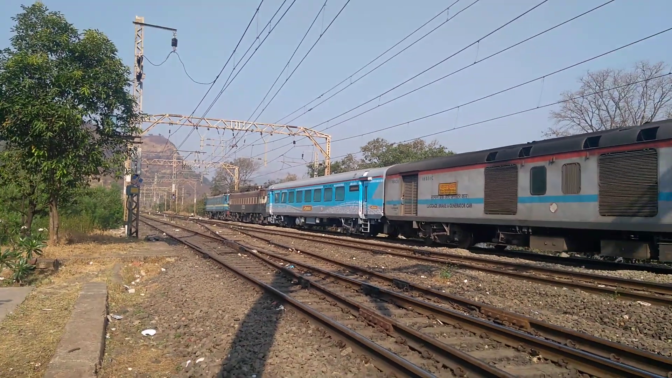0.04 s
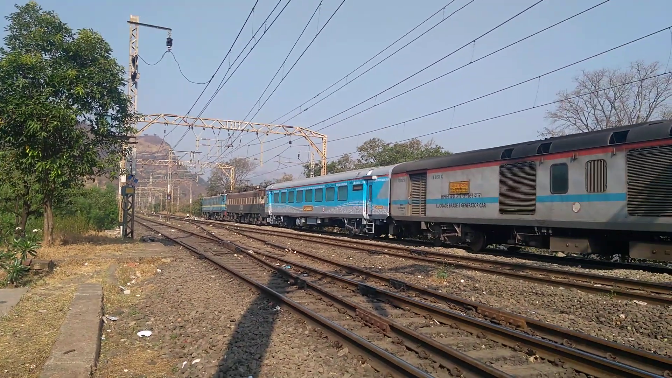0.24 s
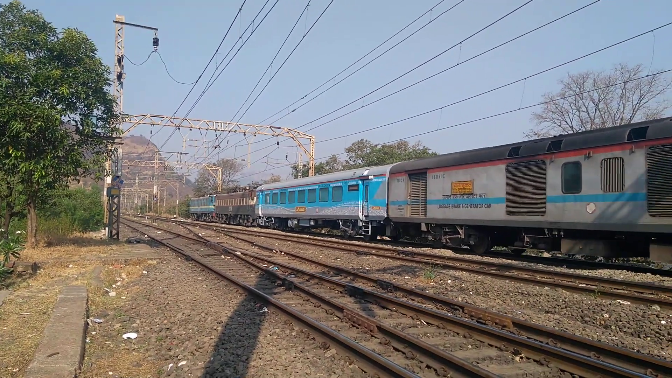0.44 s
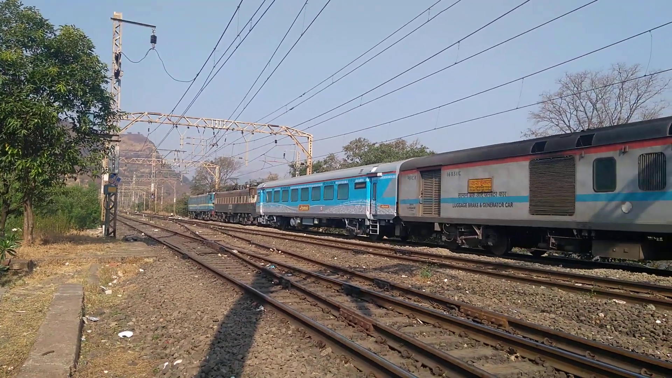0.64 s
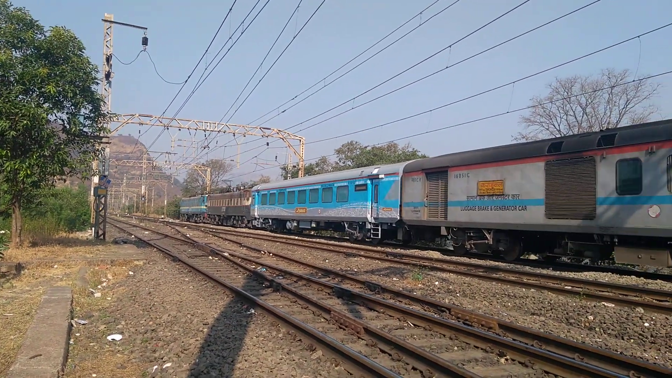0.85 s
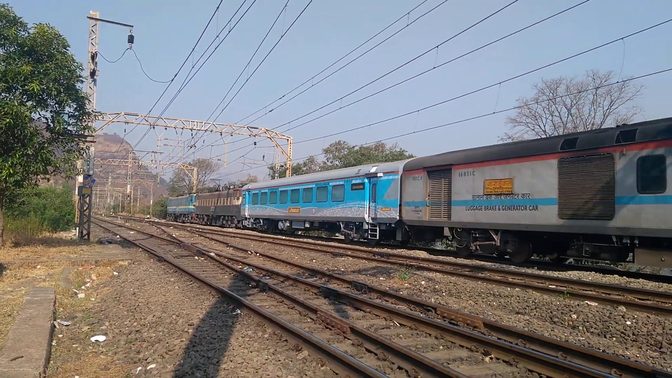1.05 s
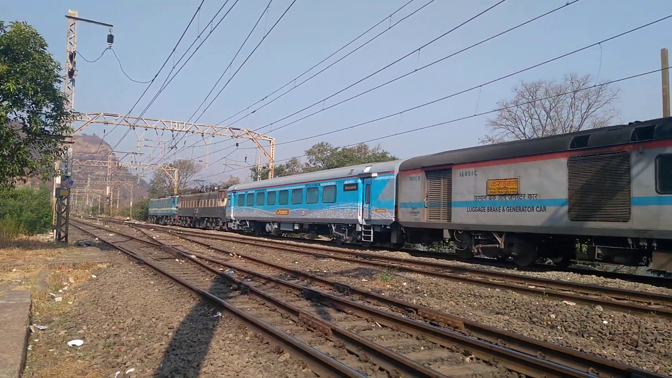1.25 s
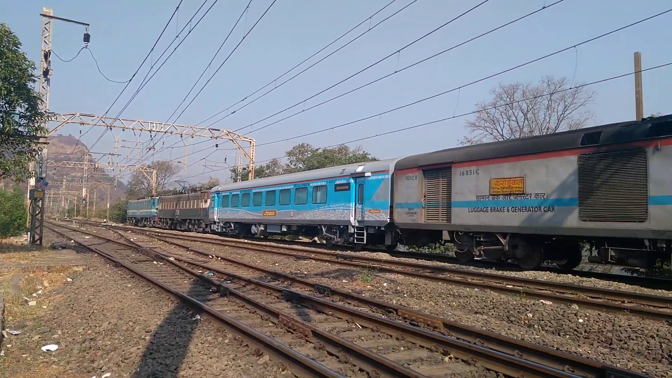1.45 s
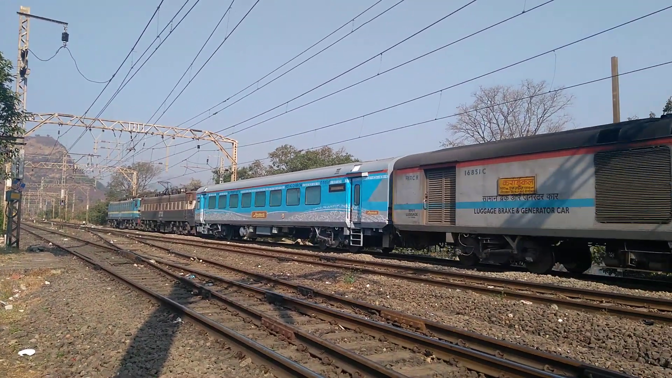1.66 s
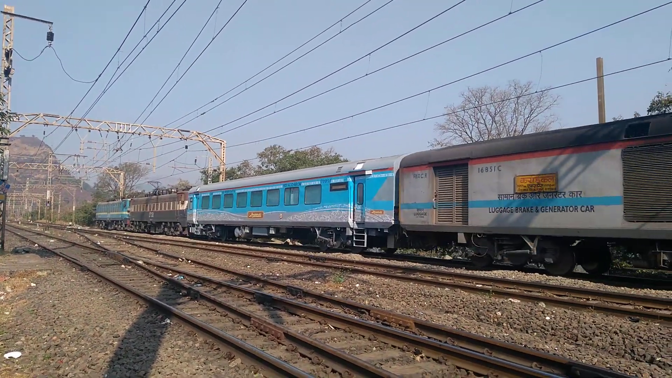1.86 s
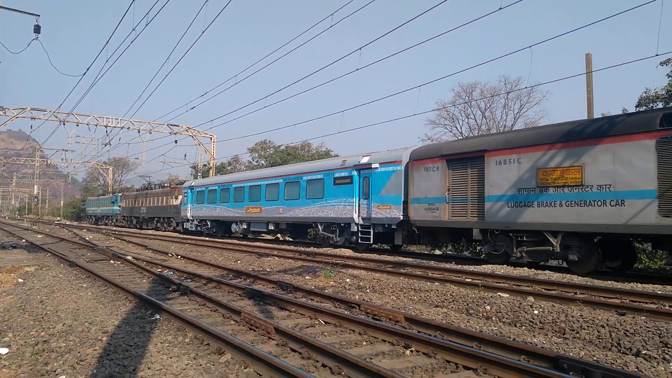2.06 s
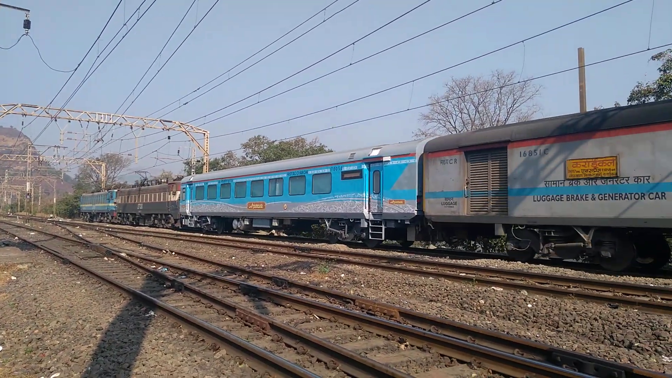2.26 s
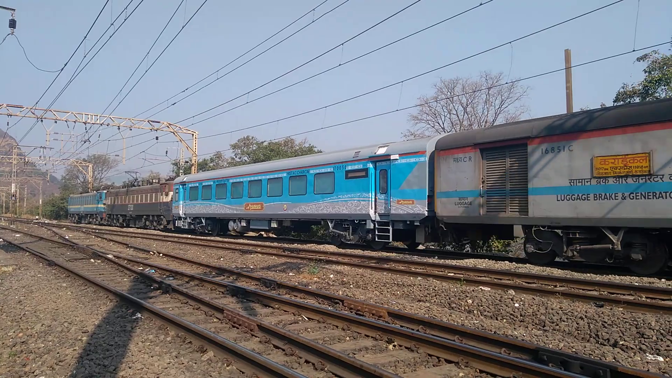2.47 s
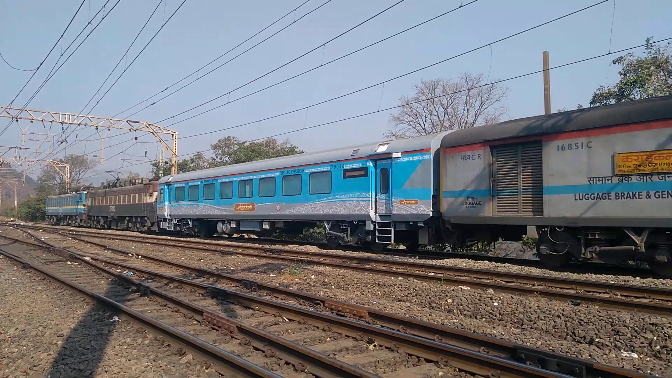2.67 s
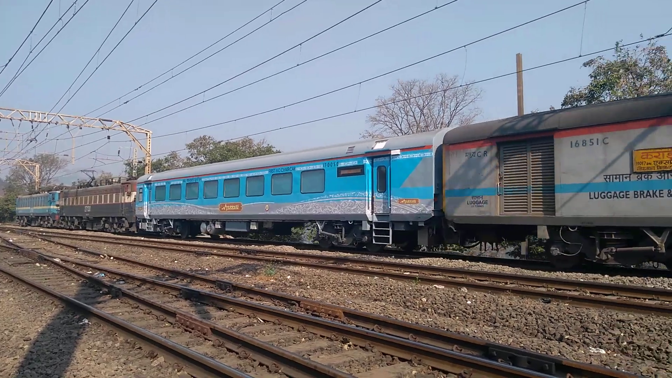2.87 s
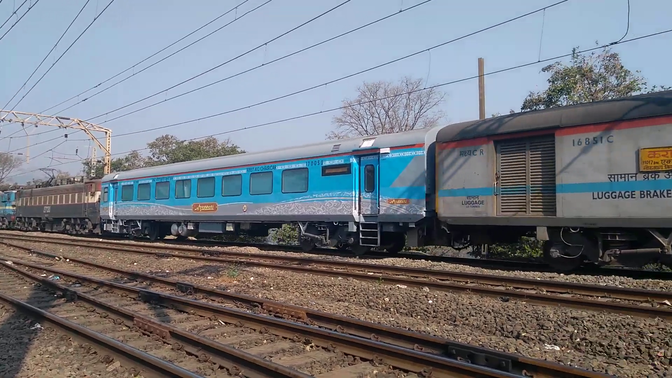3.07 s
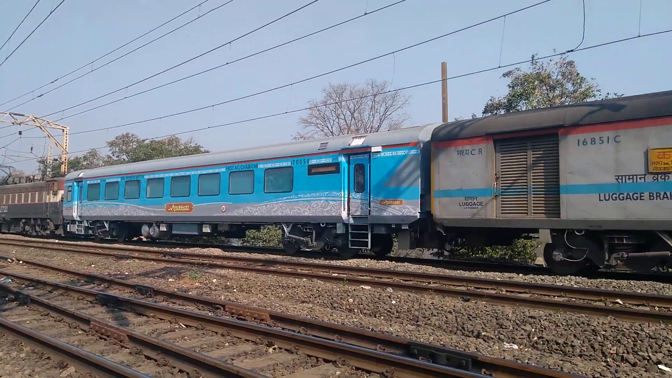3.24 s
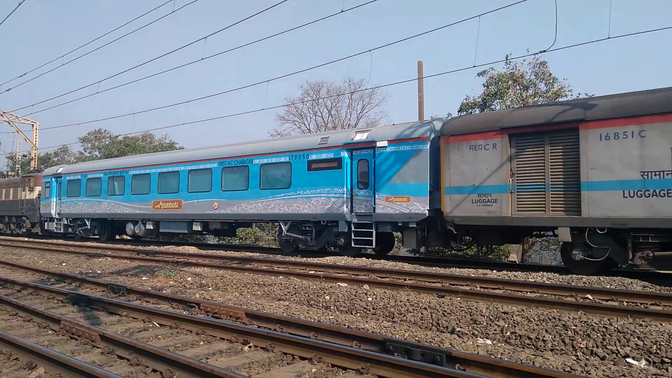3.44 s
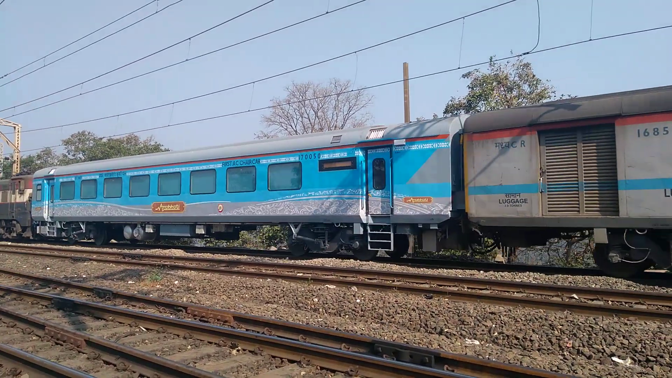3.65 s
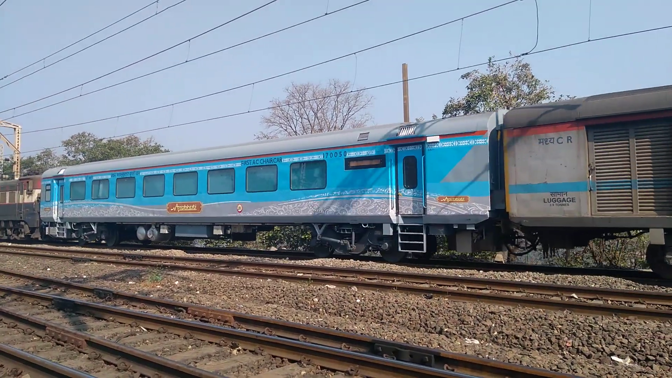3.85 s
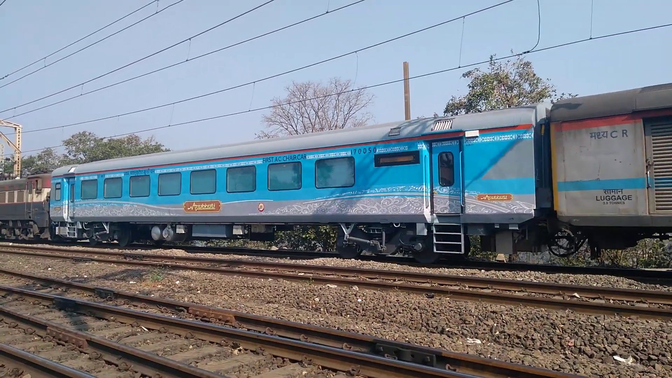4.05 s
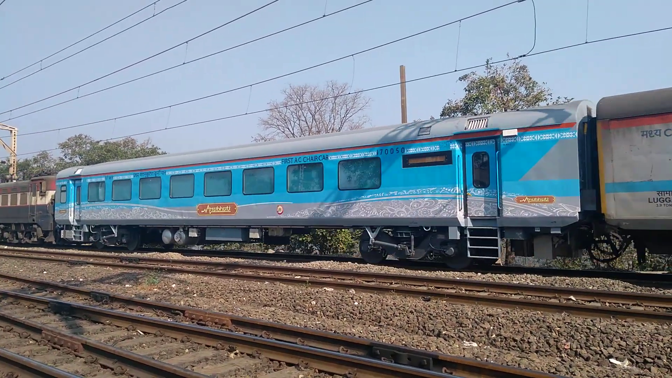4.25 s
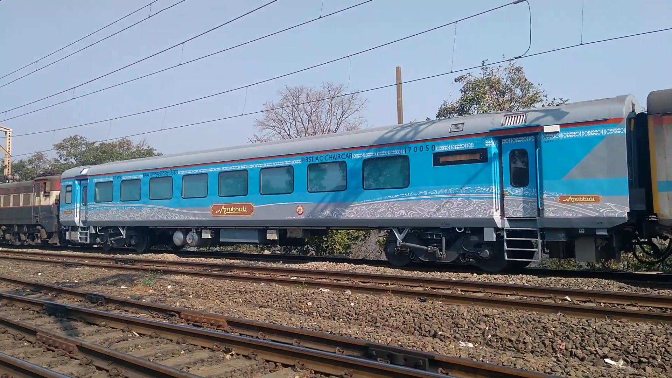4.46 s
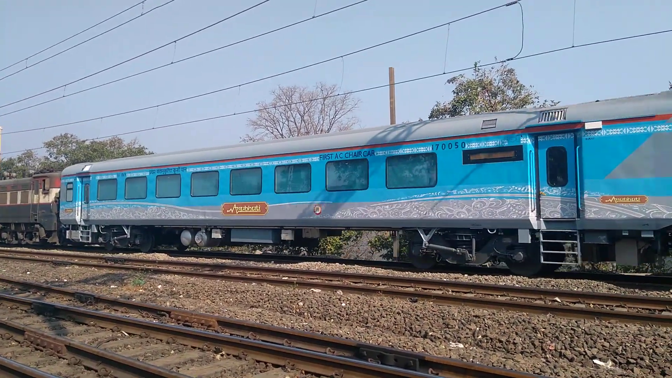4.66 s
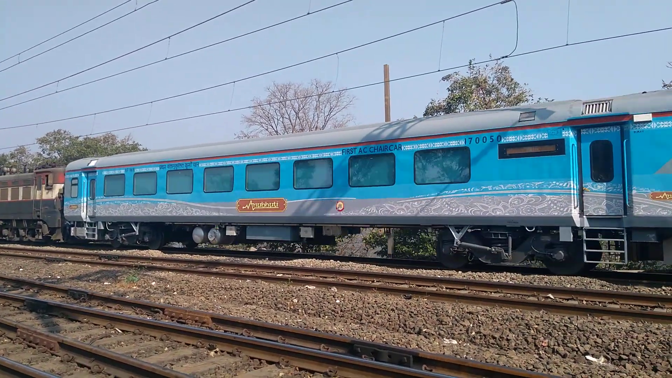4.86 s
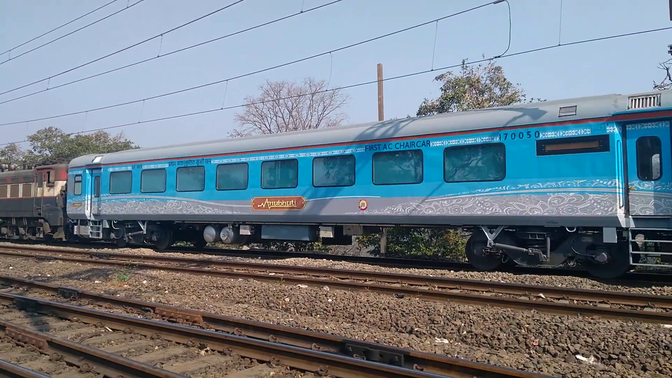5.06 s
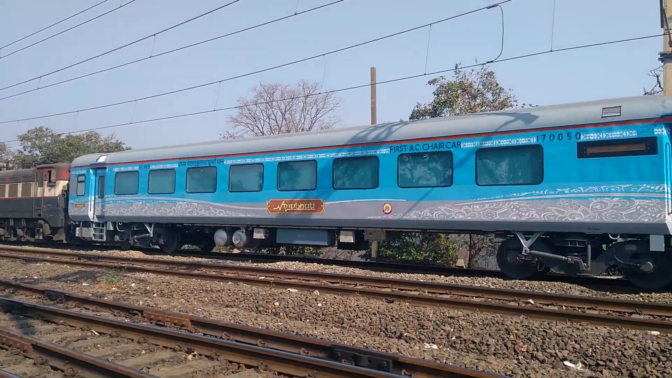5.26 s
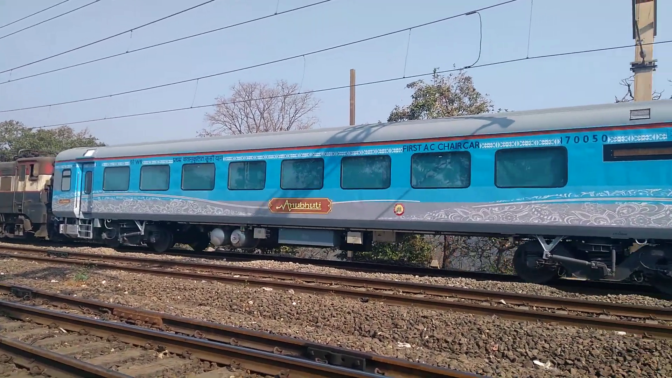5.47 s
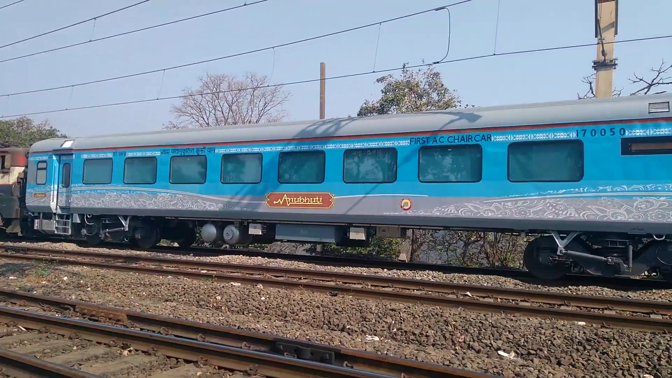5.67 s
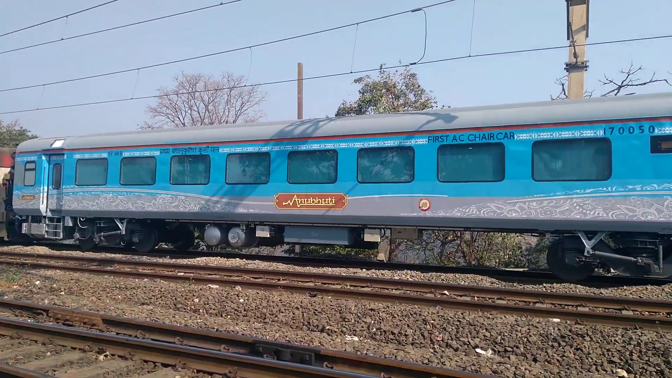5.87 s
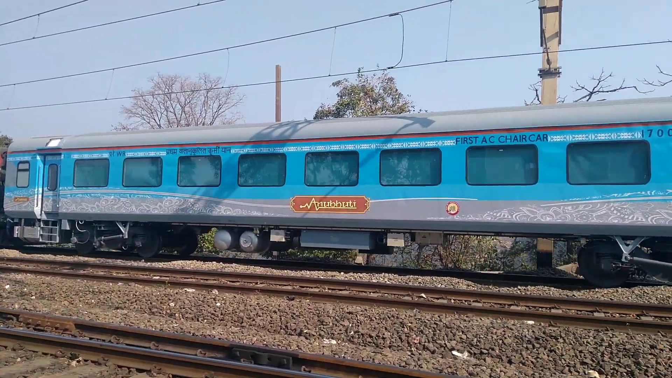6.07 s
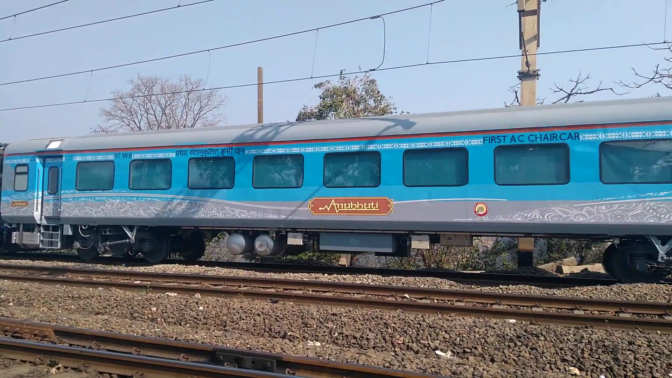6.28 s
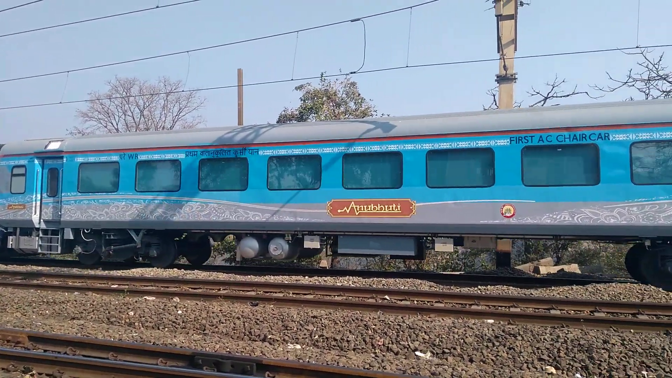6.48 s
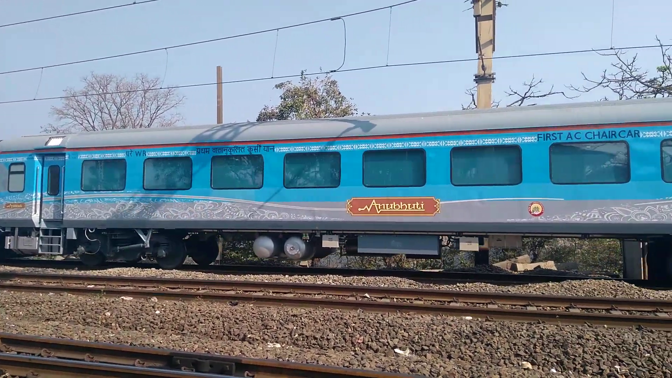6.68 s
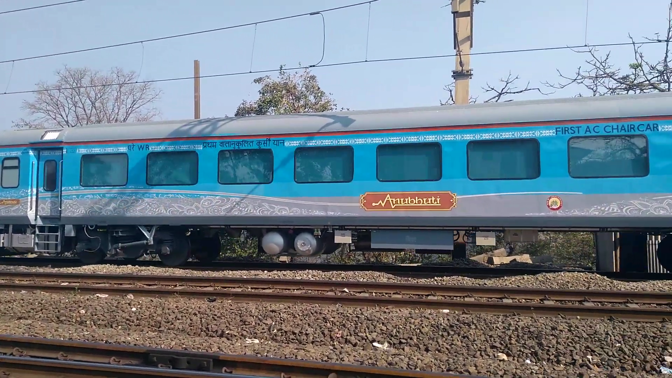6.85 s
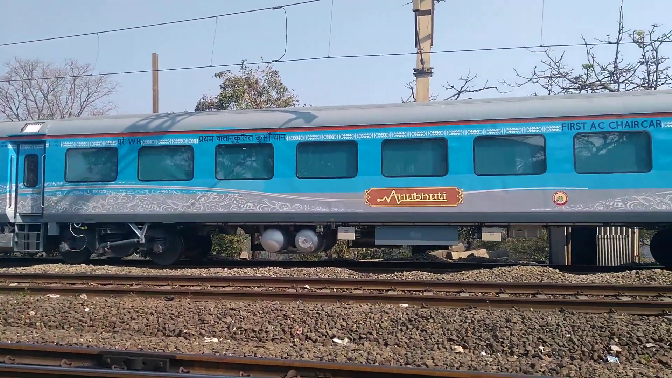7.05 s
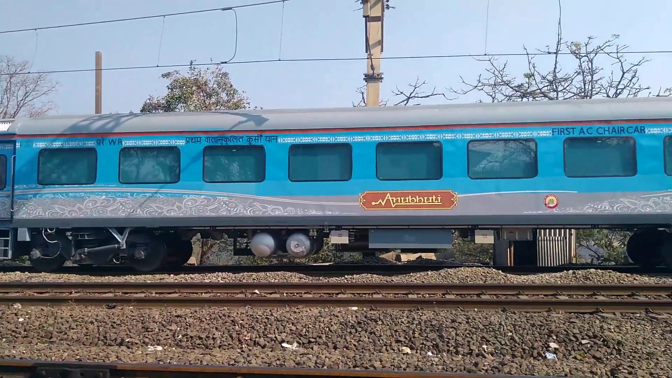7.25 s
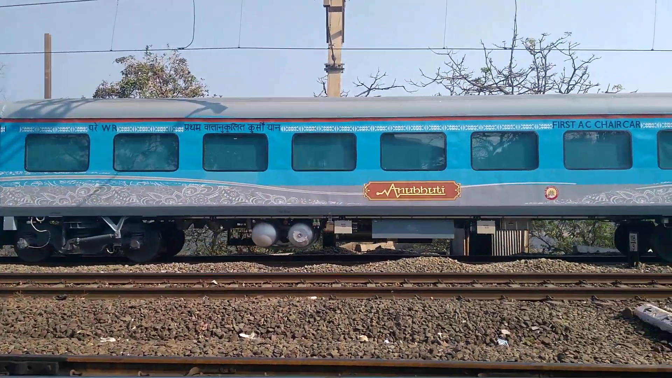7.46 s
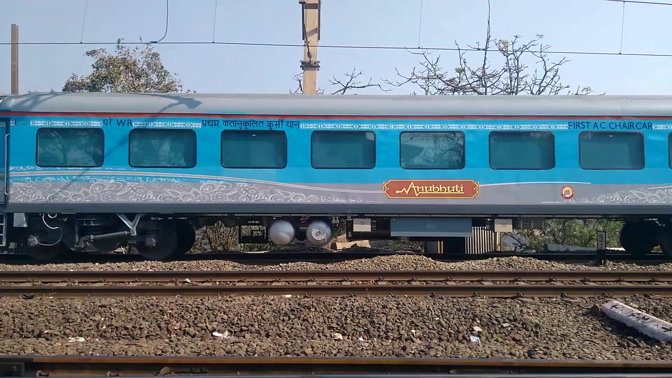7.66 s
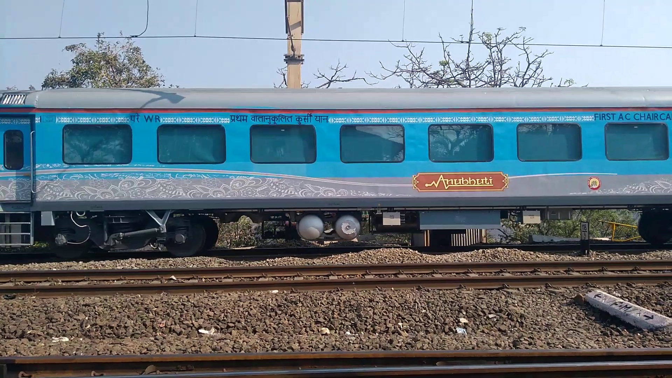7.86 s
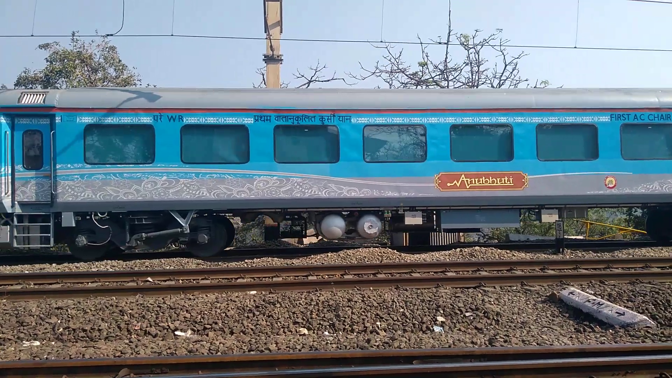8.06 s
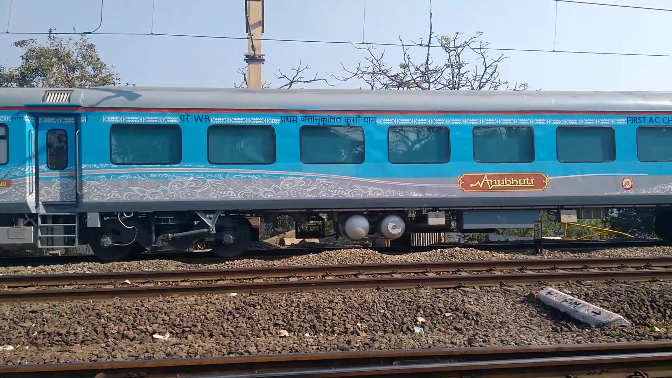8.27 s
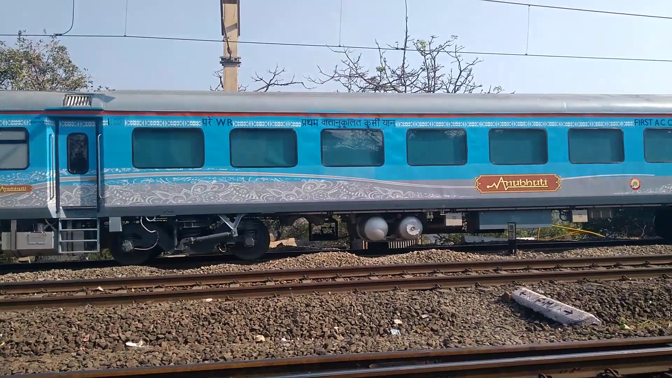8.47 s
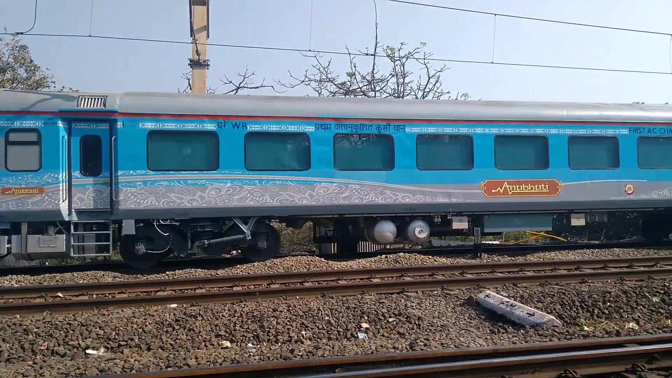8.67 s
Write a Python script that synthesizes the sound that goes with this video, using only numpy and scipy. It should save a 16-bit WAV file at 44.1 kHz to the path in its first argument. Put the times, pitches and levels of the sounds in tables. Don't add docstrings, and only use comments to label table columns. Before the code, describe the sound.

A steady low engine drone pulses under a broad rush of cooling air, strongest in the first two seconds, then dulls as the car rolls away. Later, sharp irregular steel clacks over rail joints grow from the other side, with faint rolling hiss and two tiny squeaks. Open air beside the track, stereo pickup on a small device with lightly compressed sound.

```python
import sys
import numpy as np
from scipy import signal
from scipy.fft import rfft, irfft, next_fast_len
from scipy.io import wavfile
from scipy.ndimage import uniform_filter1d

SR = 44100
rng = np.random.default_rng(int(sys.argv[2]) if len(sys.argv) > 2 else 0)


def boost_factor(decibels):
    exponent = np.asarray(decibels, float) / 20
    return 10 ** exponent


def materialize(psi):
    bounded = np.clip(np.atleast_2d(psi).T, -1, 1)
    quanta = np.round(bounded * 32767).astype(np.int16)
    wavfile.write(sys.argv[1], SR, quanta)


N = 384552
T = np.arange(N) / SR
PADDED = 2 * next_fast_len(N // 2)
HZ = np.maximum(np.arange(PADDED // 2 + 1) * SR / PADDED, 1)


def in_time(rows):
    s, *columns = np.transpose(rows)
    return [np.interp(T, s, column) for column in columns]


def over_hz(points):
    hz, values = np.transpose(points)
    return np.interp(np.log(HZ), np.log(hz), values)


def colour(x, *gains):
    spectrum = rfft(x, PADDED)
    out = [irfft(spectrum * gain, PADDED)[..., :N] for gain in gains]
    return out if len(gains) > 1 else out[0]


def sloped(points):
    low_end = 1 + (points[0][0] / HZ) ** 4
    high_end = 1 + (HZ / points[-1][0]) ** 4
    gain = boost_factor(over_hz(points)) / low_end / high_end
    return gain / np.sqrt(np.mean(gain ** 2))


def resonances(modes):
    power = 0
    for hz, width, db in modes:
        shape = 1 / (1 + (2 * (HZ - hz) / width) ** 2) ** 2
        power = power + boost_factor(2 * db) * SR / (np.pi * width) * shape * 2
    return np.sqrt(power)


def drift(rate):
    r = np.exp(-64 * np.pi * rate / SR)
    coarse = rng.standard_normal(N // 32 + 2002)
    slow = signal.lfilter([1], [1, -2 * r, r * r], coarse)[2000:]
    return np.interp(np.arange(N) / 32, np.arange(len(slow)), slow / slow.std())


def airborne():
    return rng.standard_normal((3, N))


def tone(hz, db):
    return np.sqrt(2) * boost_factor(db) * np.sin(2 * np.pi * np.cumsum(hz) / SR)


def blend(near, far, span_s):
    return near + np.clip(T / span_s, 0, 1) * (far - near)


TURN_AWAY_S, SHRINK_S = 2.5, 9.1
# (frequency [Hz], share [0-1])
LOCO_SCATTER = [(40, .01), (130, .05), (400, 0.14), (900, 0.44), (2200, 0.071), (3800, 0.83), (6000, 0.61),
                (8000, 0.28), (12000, 0.4)]
# (frequency [Hz], share [0-1])
CAR_SCATTER_NEAR = [(40, .01), (400, 0.28), (900, 0.52), (2200, 0.084), (3600, 0.51), (5200, 0.52),
                    (7000, 0.31), (8800, 0.56), (10500, 0.68)]
# (frequency [Hz], share [0-1])
CAR_SCATTER_FAR = [(40, .01), (130, .05), (400, 0.13), (900, 0.55), (2200, 0.29), (4500, 0.94),
                   (7700, 0.073), (12500, 0.18)]


def ports(rows, lag, shade, lead=0, count=4, near=None):
    tables = (CAR_SCATTER_NEAR, CAR_SCATTER_FAR) if near else (LOCO_SCATTER, LOCO_SCATTER)
    shares = [np.clip(over_hz(table), 0, 1) for table in tables]
    straight = blend(*colour(rows[0], *[np.sqrt(1 - share) for share in shares]), SHRINK_S)
    scatter = blend(*colour(rows[1:], *[np.sqrt(share) for share in shares]), SHRINK_S)
    fine = signal.resample_poly(straight, count, 1)
    at = np.arange(N) + np.outer([-.5, .5], np.ones(N)) * lag
    both = np.interp(count * at, np.arange(count * N), fine) + scatter
    halves = np.array([[.5], [-.5]])
    gains = [(boost_factor(over_hz(table)) * np.exp(1j * lead)) ** halves for table in (near or shade, shade)]
    return blend(*colour(both, *gains), TURN_AWAY_S)


# (time [s], peak level [dB], extra level of the two middle modes [dB])
KNOCK_TIMES = [(7.3312, -38, -2), (7.4096, -40, 3), (7.431, -35, 0), (7.492, -41, 0), (7.56, -41, 0),
               (7.6201, -34, -3), (7.8296, -41, 2), (8.3814, -40, 3), (8.3874, -35, 5), (8.3924, -36, 7),
               (8.3984, -32, 7), (8.4154, -29, 0), (8.4454, -40, 3), (8.5121, -36, 0)]
# (frequency [Hz], level [dB], time to fade 60 dB [s])
TYRE_MODES = [(3520, -7.5, .045), (3720, -7, .03), (4050, -9, .025), (4500, -4, .03), (6000, -17, .015),
              (6700, -20, .012)]


def knocks():
    s, db, middle_db = np.transpose(KNOCK_TIMES)
    out = np.zeros(N)
    chance_db = rng.normal(0, 3, (len(s), len(TYRE_MODES)))
    for k, (hz, level_db, t60) in enumerate(TYRE_MODES):
        clicks = np.full(N, 1e-18)
        clicks[(s * SR).astype(int)] = boost_factor(db + level_db - 3.0 + chance_db[:, k] + middle_db * (k in (2, 3)))
        r, w = boost_factor(-60 / (t60 * SR)), 2 * np.pi * hz / SR
        out += signal.lfilter([0, np.sin(w)], [1, -2 * r * np.cos(w), r * r], clicks)
    return out * [[1], [0], [0]]


# (time [s], peak level [dB], length [s])
JOINTS = [(5.517, -41, 0.024), (6.248, -35, 0.048), (6.748, -48, 0.04), (6.808, -32.5, 0.038),
          (6.885, -41, 0.02), (7.1994, -37, 0.053), (7.323, -30, 0.041), (7.409, -27.5, 0.046),
          (7.476, -35, 0.051), (7.611, -33, 0.038), (7.957, -40, 0.035), (8.378, -29, 0.04),
          (8.448, -40, 0.032), (8.507, -36, 0.03), (8.623, -55, 0.029)]
# (frequency [Hz], width [Hz], level [dB])
WHEEL_MODES = [(2500, 900, -7), (3550, 600, 1), (4500, 900, -4), (6000, 1500, -2), (8000, 2000, -9)]


def clatter(rolling_db):
    burst = boost_factor(rolling_db - 17.0 + 2.5 * drift(12.0))
    for s, db, length in JOINTS:
        span = slice(int(s * SR), int((s + 9 * length) * SR))
        age = (T[span] - s).clip(0) / length
        fall = np.exp(-age ** 2) + 0.22 * np.exp(-age * 0.5)
        burst[span] += boost_factor(db - 21.5) * np.minimum(age * 9.2, 1) * fall
    rattle = colour(airborne(), resonances(WHEEL_MODES)) * [[1.2], [.6], [.6]]
    return burst * boost_factor(0.79 * drift(150.0)) * rattle


# (time [s], rolling level [dB], left lag [samples])
LOCO_APPROACH = [(0, -48.5, -20.5), (3, -52, -9.5), (5, -48.5, -8.5), (7.2, -45.5, -12.5),
                 (8.2, -45.5, -12.5), (8.72, -41.5, -12.5)]
# (frequency [Hz], level per Hz [dB])
ROLLING_SPECTRUM = [(300, -41), (700, 1), (1100, -16.5), (1700, -4.5), (2600, -9), (3800, -11.5),
                    (5500, -15.5), (8000, -21.5), (10000, -36), (13000, -36), (14200, -45), (15000, -65)]
# (frequency [Hz], left minus right [dB])
LOCO_SIDE_SHADE = [(300, 6), (2400, -0.5), (4200, -7), (6500, -5), (9000, 13), (12000, -25), (15000, -12)]


def locomotives():
    rolling_db, lag = in_time(LOCO_APPROACH)
    rolling = boost_factor(rolling_db + .3 * drift(8.0)) * colour(airborne(), sloped(ROLLING_SPECTRUM))
    return ports(rolling + clatter(rolling_db) + knocks(), lag, LOCO_SIDE_SHADE)


# (time [s], frequency [Hz], level [dB], length [s])
FLANGE_SQUEAKS = [
    (6.812, 2570, -55, .035),
    (7.618, 2330, -55, .042),
]


def squeak():
    out = 0
    for s, hz, db, length in FLANGE_SQUEAKS:
        age = np.clip((T - s) / length, 0, 1)
        out = out + tone(np.full(N, hz), db) * np.sqrt(np.sin(np.pi * age) + 1e-12)
    return out * boost_factor([[2.0], [-4.0]])


# (frequency [Hz], level per Hz [dB])
RUMBLE_SPECTRUM = [(35, -14), (55, -7.5), (110, -0.5), (200, -3), (400, -5.5), (600, -6.5), (900, -10),
                   (1300, -13), (2000, -11.5)]


def rumble(rumble_db):
    return boost_factor(rumble_db - 1.5 + .5 * drift(5.6)) * colour(airborne(), sloped(RUMBLE_SPECTRUM))


RIDGE_START_HZ, RIDGE_END_HZ, RIDGE_SINK_S = 720.3, 289.7, 1.3
RIDGE_DB, RIDGE_HOLD_S, RIDGE_FADE_DB_PER_S = -36, 3.5, 5


def ridge():
    hz = RIDGE_END_HZ + (RIDGE_START_HZ - RIDGE_END_HZ) * np.exp(-T / RIDGE_SINK_S)
    db = RIDGE_DB - RIDGE_FADE_DB_PER_S * np.maximum(T - RIDGE_HOLD_S, 0)
    turn = 2 * np.pi * np.cumsum(hz) / SR
    slow = resonances([(1, 75, 0)])
    return boost_factor(db - 3.5) * (colour(airborne(), slow) * np.cos(turn) + colour(airborne(), slow) * np.sin(turn))


# (frequency [Hz], width [Hz])
PANEL_MODES = [(313.5, 54), (408, 50), (492, 84), (617, 130), (491.3, 23)]
# (number in the table above, time [s],
# level [dB], rise [dB/s], fall [dB/s])
PANEL_FACING = [(0, 3.27, -35.5, 3.5, 4), (1, 1.2, -29.5, 27, 10), (1, 2.47, -32, 8.5, 10.5),
                (2, 0.51, -35.5, 7, 11), (2, 4.2, -35.5, 3.5, 11), (3, 0.05, -36.5, 1.5, 2.5),
                (4, 4.9, -43, 5.5, 13), (4, 6.2, -49.5, 4, 5), (0, 5.35, -45, 14, 20),
                (0, 6.6, -41.5, 8, 10), (1, 3.1, -40, 6, 5), (0, 2.2, -39.5, 11, 8), (4, .9, -44, 10, 10)]


def panels():
    power = np.zeros((len(PANEL_MODES), N))
    for panel, s, db, rise, fall in PANEL_FACING:
        facing_db = db - rise * np.maximum(s - T, 0) - fall * np.maximum(T - s, 0)
        power[int(panel)] += boost_factor(2 * facing_db)
    booms = colour(airborne(), *[resonances([(hz, width, 0)]) for hz, width in PANEL_MODES])
    return sum(np.sqrt(p) * boost_factor(1.08 * drift(1.1) - 5.0) * boom for p, boom in zip(power, booms))


# (frequency [Hz], level per Hz [dB])
HISS_SPECTRUM = [(1000, 2.5), (1400, -7), (2000, -7), (3700, -9), (4800, -11), (6000, -14), (7500, -11.5),
                 (8600, -17), (9800, -15.5), (11000, -18), (13000, -30), (15000, -25)]
# (frequency [Hz], width [Hz], level against the hiss [dB])
LOUVRE_WHISTLES = [(3860, 280, -18), (6780, 250, -21), (8450, 420, -14.5), (9270, 360, -17.5),
                   (12000, 450, -25), (13160, 500, -28.5), (15000, 300, -35)]
LOUVRE_FOLLOWS = 0.23


def louvre_hiss(hiss_db, open_db):
    hiss_gain = sloped(HISS_SPECTRUM)
    plain, whistling = colour(airborne(), hiss_gain, np.hypot(hiss_gain, resonances(LOUVRE_WHISTLES)))
    air = plain + boost_factor(2.5 + LOUVRE_FOLLOWS * open_db) * (whistling - plain)
    below_bright, below_top = colour(air, 1 / (1 + (5500 / HZ) ** 6), 1 / (1 + (10500 / HZ) ** 8))
    edge = colour(air, 1 / (1 + (14500 / HZ) ** 40))
    shared_db = .3 * drift(8.0)
    bright_db = .85 * drift(16.0)
    top_db = .38 * open_db + 1.4 * drift(21.0)
    top = below_top - edge + boost_factor(1.0 * open_db - 1.5) * edge
    bright = below_bright - below_top + boost_factor(top_db) * top
    return boost_factor(hiss_db + 7.0 + shared_db) * (air - below_bright + boost_factor(bright_db) * bright)


# (multiple of the firing rate, level under the fading car [dB])
CRANK_ORDERS = [(2 / 3, -24), (4 / 3, -19.5), (7 / 3, -16.5), (2, -18.5), (3, -21.5), (4.5, -24),
                (8 / 3, -22.5)]
# (thirds of the firing rate, time [s], level [dB], half length [s])
CRANK_SWELLS = [(7, 4.07, -42.5, 0.87), (4, 2, -49.5, 1.3), (13, 2.0, -55, 0.55), (13, 4.87, -52, 1.6),
                (14, 2.5, -49.5, 1.8), (15, 2.9, -57, .8), (16, 1.7, -55, .6), (17, 1.14, -46, 1),
                (17, 4.36, -48, .4), (19, 2.0, -51, .5), (19, 4.24, -48, 0.8), (20, 1.3, -48, 0.33),
                (20, 2.6, -49, .5), (20, 4.74, -51, .5), (21, 3.2, -50, .5), (12, 4.3, -52, 2.0)]


def crank_orders(turn, fade_db):
    out = np.zeros(N)
    for order, db in CRANK_ORDERS:
        out += boost_factor(fade_db + db + 4.7 * drift(1.0)) * np.sin(order * turn)
    for thirds, s, db, half in CRANK_SWELLS:
        span = slice(max(int((s - 3 * half) * SR), 0), int((s + 3 * half) * SR))
        swell = np.exp(-((T[span] - s) / half) ** 2)
        out[span] += boost_factor(db) * swell * np.sin(thirds / 3 * turn[span] + s)
    return out


# (frequency [Hz], time [s], level [dB], half length [s])
ALTERNATOR = (1424.5, 0.2, -55, 1)


def alternator_whine():
    hz, s, db, half = ALTERNATOR
    return boost_factor(db) * np.exp(-((T - s) / half) ** 4) * np.sin(2 * np.pi * hz * T)


BLOWER_DB, BLOWER_FOLLOWS = -46.5, 0.52
BLOWER_BEAM_DB, BLOWER_BEAM_S = 10, 0.77


def blower(hz, open_db):
    db = BLOWER_DB + BLOWER_FOLLOWS * open_db + BLOWER_BEAM_DB * np.exp(-(T / BLOWER_BEAM_S) ** 4)
    return tone(hz + .5 * drift(1.24), db + 1.5 * drift(3.0))


# (time [s], firing [Hz], frame shake [Hz], blower [Hz])
SET_PITCH = [(0, 76.1, 24.1, 251.3), (1.2, 75.85, 24.2, 250.3), (3.2, 75.4, 24.6, 247.5),
             (5.2, 75.0, 25.05, 246), (8.72, 74.8, 25.05, 245)]
# (time [s], level [dB])
FIRING_LEVEL = [(0.0, -31.5), (0.46, -26), (1.58, -26), (2.31, -27), (3.45, -24), (4.13, -24), (4.9, -31.5),
                (5.6, -30), (6.12, -28), (6.61, -31.5), (7.38, -28.5), (8.4, -36), (8.72, -37)]
# (time [s], fan tone level [dB], second firing harmonic level [dB], frame shake level [dB])
ECHO_SWELLS = [(0, -39.5, -57, -50), (.5, -36, -41, -45), (.95, -34, -37.5, -45), (1.35, -36, -38.5, -45),
               (1.75, -39.5, -47, -46), (2.4, -37.5, -50, -45), (2.95, -34, -54, -45), (3.5, -39, -44, -42),
               (4.1, -46, -48, -43), (4.6, -39.5, -62, -47), (5.0, -39.5, -55, -51), (5.7, -55, -51, -49),
               (6.1, -45, -47.5, -47), (6.8, -40, -53, -49), (7.3, -43, -49, -48), (7.8, -48.5, -44.5, -50),
               (8.72, -50, -41, -55)]
SLIP_TURNS, SLIP_HZ, SLIP_SAG_HZ_PER_S = -.25, 3.7125, .0387


def diesel(fade_db, open_db):
    hz, shake_hz, blower_hz = in_time(SET_PITCH)
    firing_db, = in_time(FIRING_LEVEL)
    fan_db, second_db, shake_db = in_time(ECHO_SWELLS)
    turn = 2 * np.pi * np.cumsum(hz) / SR
    slip = SLIP_TURNS + SLIP_HZ * T - SLIP_SAG_HZ_PER_S * T ** 2 / 2
    firing = boost_factor(firing_db + .5 * drift(6.0)) * np.sin(turn) + boost_factor(second_db) * np.sin(2 * turn)
    fan = boost_factor(fan_db + .4 * drift(3.0)) * np.sin(2 * turn - 2 * np.pi * slip)
    tones = firing + fan + crank_orders(turn, fade_db) + alternator_whine()
    shake = tone(shake_hz, shake_db + .6 * drift(3.0))
    return np.sqrt(2) * tones + shake + blower(blower_hz, open_db)


# (time [s], level [dB])
CAR_OPENNESS = [(0.0, -45.5), (0.75, -45), (1.0, -44.5), (1.5, -43.5), (2.1, -45), (2.5, -46.5),
                (3.1, -48.5), (3.45, -49), (4.4, -52), (4.9, -54.5), (5.5, -56), (7.0, -59.5), (7.4, -58.5),
                (8.72, -58.5)]
# (time [s], left minus right [dB])
HUM_TIP = [(0, -0.5), (1.7, 1.2), (4.3, -0.5), (5.8, 1.2), (8.72, -1)]
# (frequency [Hz], left minus right [dB])
CAR_NEAR_SHADE = [(100, 0.5), (1300, 0), (4000, 0.5), (5600, 1.5), (7000, 1), (9000, -1), (10400, -3),
                  (12000, 3)]
# (frequency [Hz], left minus right [dB])
CAR_FAR_SHADE = [(100, 2), (1300, 0), (3800, 0), (5500, 7), (8000, 0), (10000, 9.5), (12000, 9),
                 (15000, 18)]
# (frequency [Hz], phase the left port gains [rad])
CAR_BENDING = [(500, 0.12), (1300, -0.14), (2300, 0.15), (4000, 0.3), (6200, -0.4), (9000, 0.012)]
RUMBLE_DB, RUMBLE_FOLLOWS = -31.5, 0.5
PORT_GAP_SAMPLES = 15.51
CAR_START, CAR_SPEED_PER_S = 0.42, 0.31
PAN_FROM_S, PAN_SAMPLES_PER_S = 5.8, .8


def generator_car():
    hiss_db, = in_time(CAR_OPENNESS)
    tip_db, = in_time(HUM_TIP)
    open_db = hiss_db - hiss_db.max()
    rumble_db = RUMBLE_DB + RUMBLE_FOLLOWS * open_db
    along = CAR_START + CAR_SPEED_PER_S * T
    lag = PORT_GAP_SAMPLES * along / np.hypot(along, 1)
    lag = lag - PAN_SAMPLES_PER_S * np.maximum(T - PAN_FROM_S, 0)
    boom = ports(ridge() + panels(), 0.26 * lag, CAR_FAR_SHADE, count=1)
    roar = rumble(rumble_db) + louvre_hiss(hiss_db, open_db)
    roar = ports(roar, lag, CAR_FAR_SHADE, over_hz(CAR_BENDING), near=CAR_NEAR_SHADE)
    hum = diesel(rumble_db, open_db)
    late = [np.interp(np.arange(N) + side * 0.5 * lag, np.arange(N), hum) for side in (-.5, .5)]
    return boom + roar + boost_factor(np.outer([.5, -.5], tip_db)) * late


def scene():
    return locomotives() + squeak() + generator_car()


# (frequency [Hz], limit against the surroundings [dB])
SILENCE_LIMIT = [(1000, -13), (1900, -7.5), (2600, -7.5), (3600, -6.5), (5500, -7), (8000, -6.5),
                 (10000, -7), (12000, -5.5), (14000, -9)]
LIMIT_START_DB, LIMIT_START_S, LIMIT_WANDER_DB = 2.5, 1.16, 1.3
PATCHY_DB_PER_KHZ = 0.15


def starve(x):
    lead = 106
    pair = np.pad([x[0] + x[1], x[0] - x[1]], ((0, 0), (lead, 0))) / 2
    hz, s, cells = signal.stft(pair, SR, "cosine", 2048, 1024)
    band_hz = hz[4:1024:8]
    power = (np.abs(cells[:, :1024]) ** 2).reshape(2, 128, 8, -1).mean(axis=2) + 1e-20
    around = uniform_filter1d(power.mean(axis=0), size=7, axis=0)
    around = np.exp(uniform_filter1d(np.log(around), size=9, axis=1))
    power = uniform_filter1d(power, size=2, axis=2)
    limit_db = np.interp(band_hz, *np.transpose(SILENCE_LIMIT), left=-60)[:, None]
    limit_db = limit_db + LIMIT_START_DB * np.exp(-(s / LIMIT_START_S) ** 2)
    limit_db = limit_db + LIMIT_WANDER_DB * rng.standard_normal(len(s))
    patches = rng.standard_normal((2, 64, len(s) // 2 + 1))
    patches = patches.repeat(2, axis=1).repeat(2, axis=2)[..., :len(s)]
    limit_db = limit_db + PATCHY_DB_PER_KHZ * band_hz[:, None] / 1000 * patches
    keep = np.clip((10 * np.log10(power / around) - limit_db) / 2 + .5, 0, 1)
    cells[:, :1024] *= np.repeat(keep, 8, axis=1)
    mid, side = signal.istft(cells, SR, "cosine", 2048, 1024)[1][:, lead:][:, :N]
    return np.array([mid + side, mid - side])


def band_limit(x):
    return signal.sosfilt(signal.butter(12, 15630, fs=SR, output="sos"), x)


# (frequency [Hz], level [dB])
NOTCH_EARLY = [(8600, 0), (9300, -5), (10050, -16), (10500, -5), (11200, 0)]
# (frequency [Hz], level [dB])
NOTCH_LATE = [(8200, 0), (8900, -2), (9400, -6), (9900, -3), (10600, -1)]
NOTCH_SINK_FROM_S, NOTCH_SINK_S = 3.5, 4.0


def record(dry):
    early, late = colour(dry[1], boost_factor(over_hz(NOTCH_EARLY)), boost_factor(over_hz(NOTCH_LATE)))
    sunk = np.clip((T - NOTCH_SINK_FROM_S) / NOTCH_SINK_S, 0, 1)
    right = blend(dry[1], early + sunk * (late - early), TURN_AWAY_S)
    mix = starve([dry[0], right])
    return band_limit(mix)


dry = scene()
out = record(dry)
materialize(out)
```